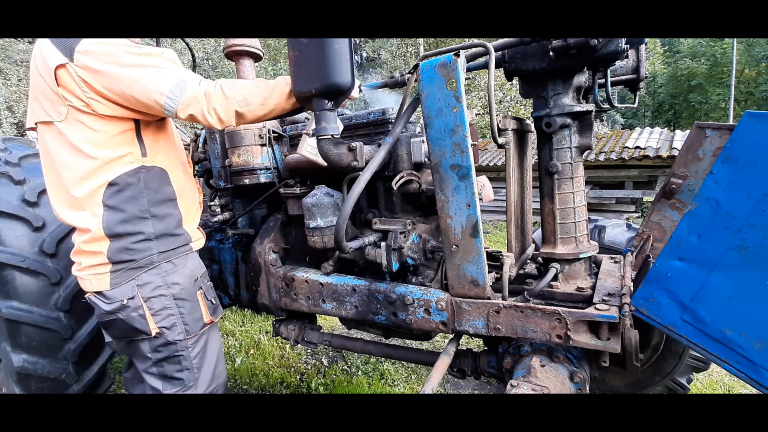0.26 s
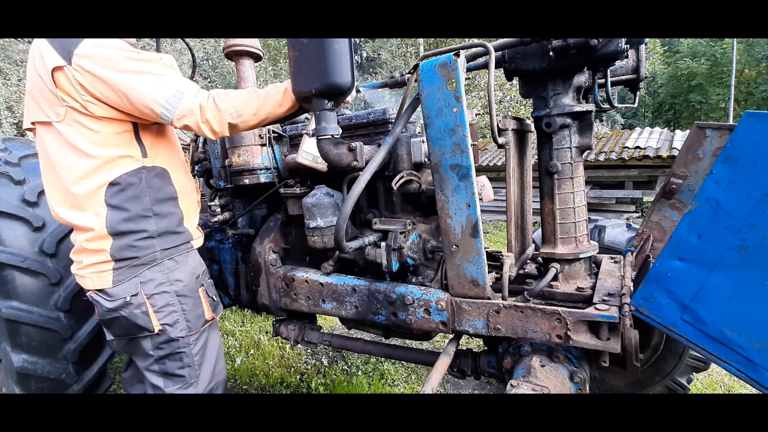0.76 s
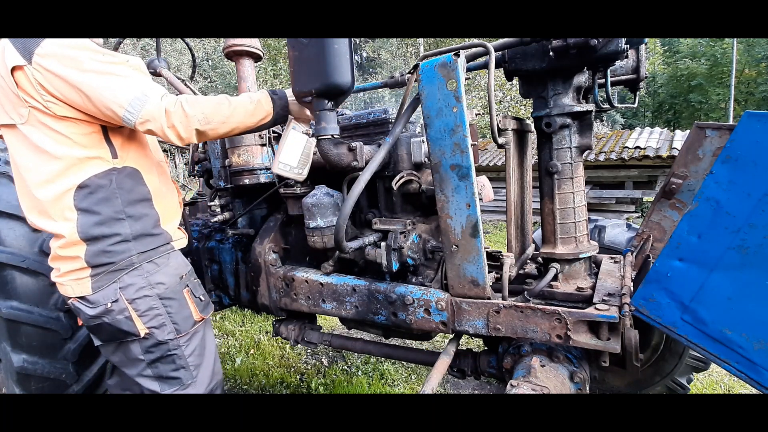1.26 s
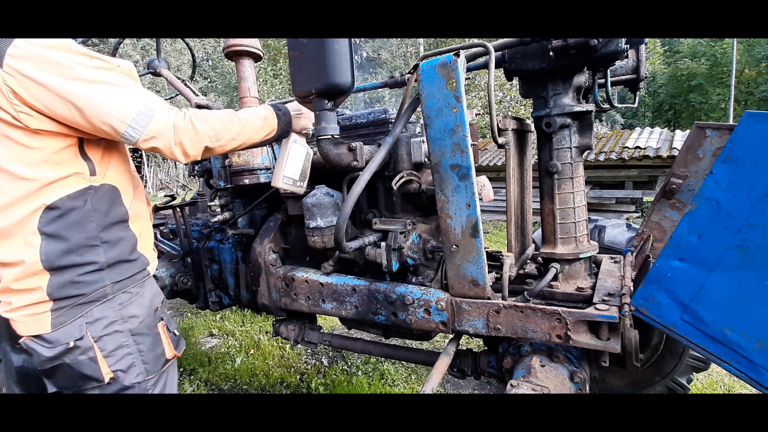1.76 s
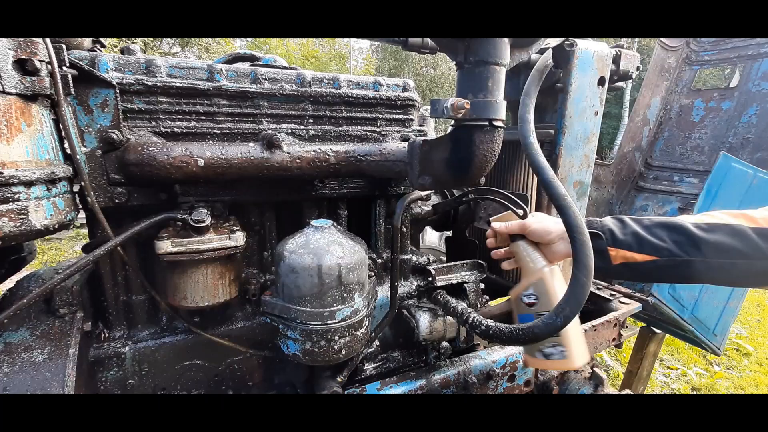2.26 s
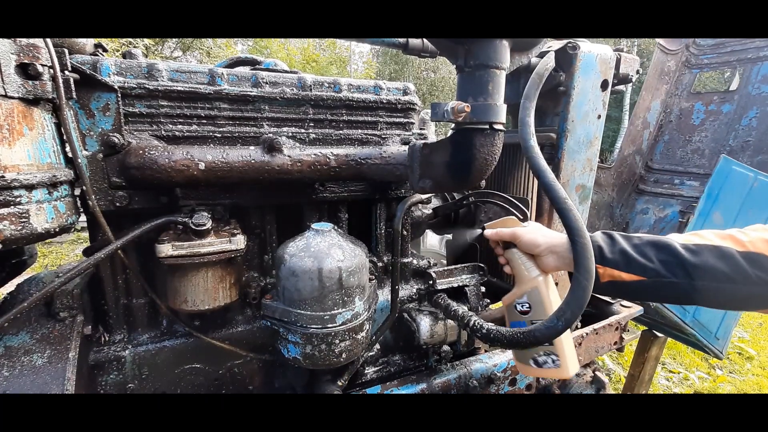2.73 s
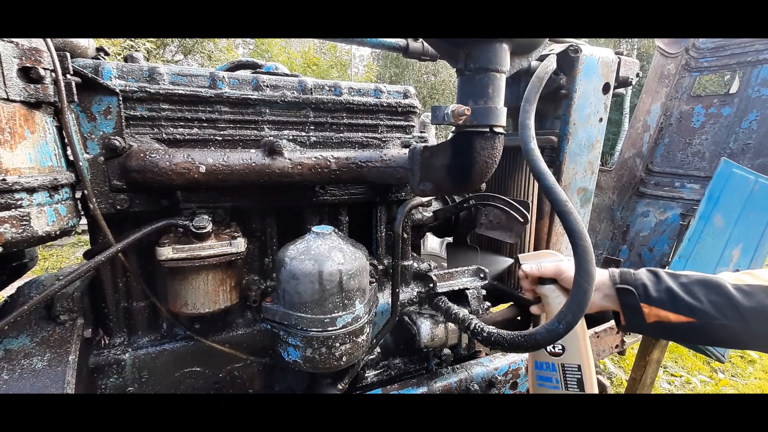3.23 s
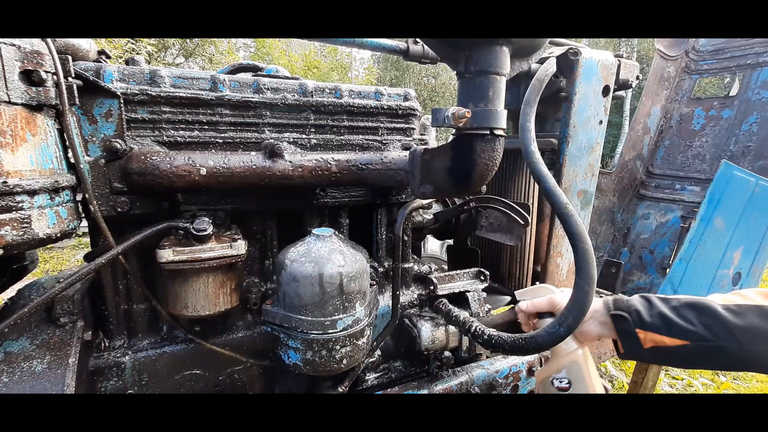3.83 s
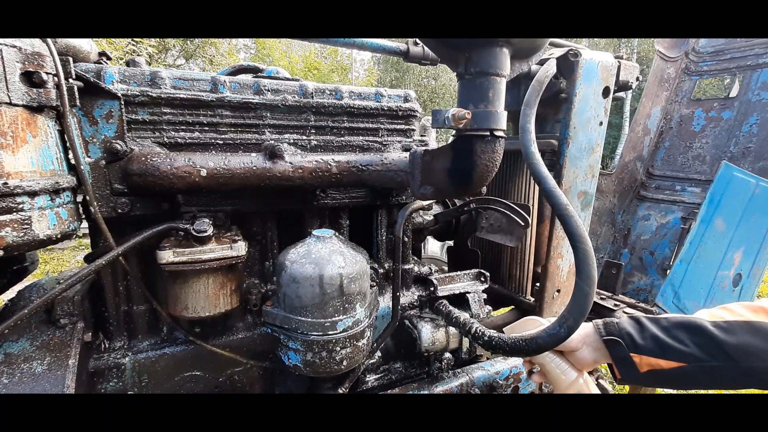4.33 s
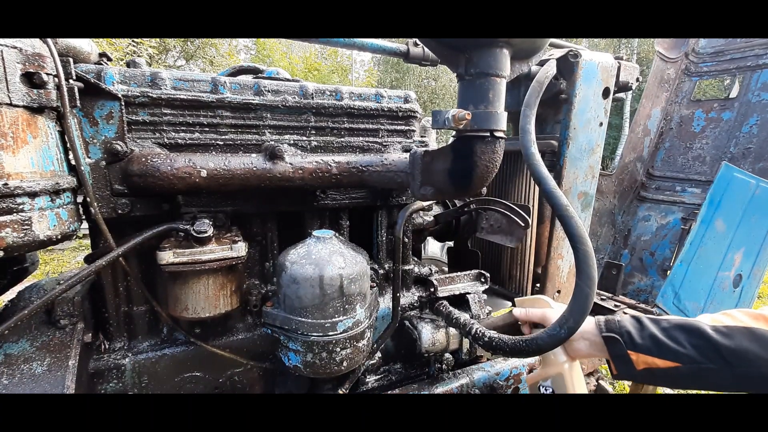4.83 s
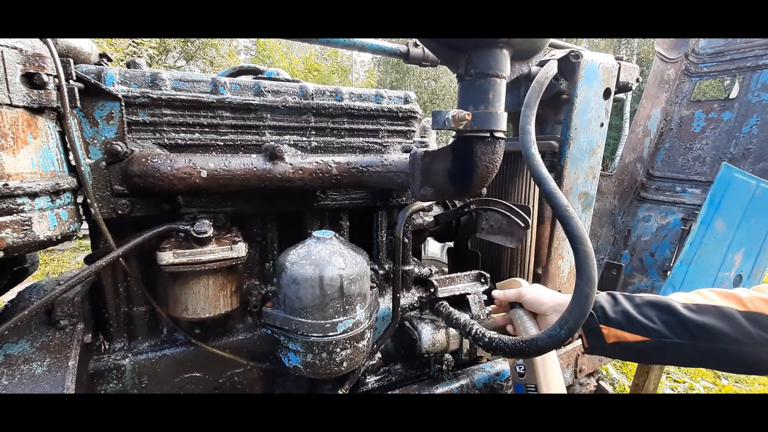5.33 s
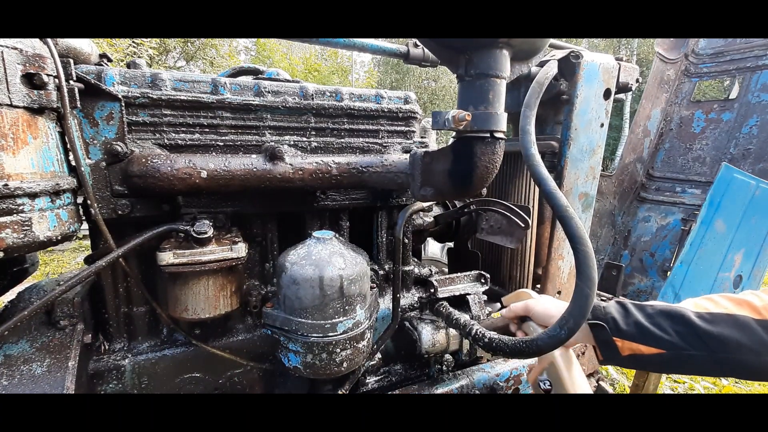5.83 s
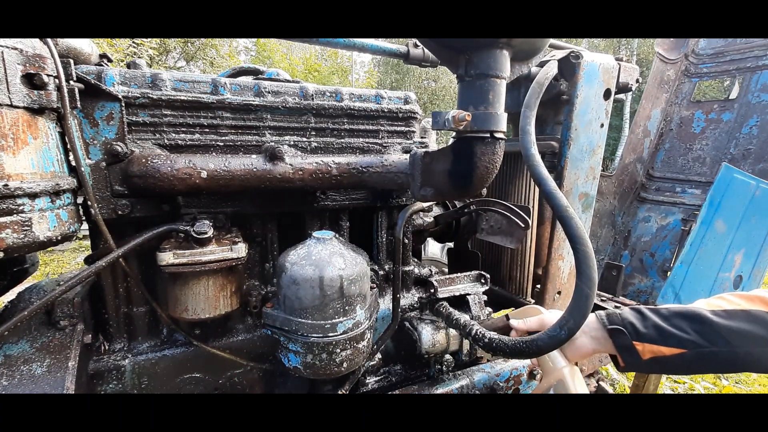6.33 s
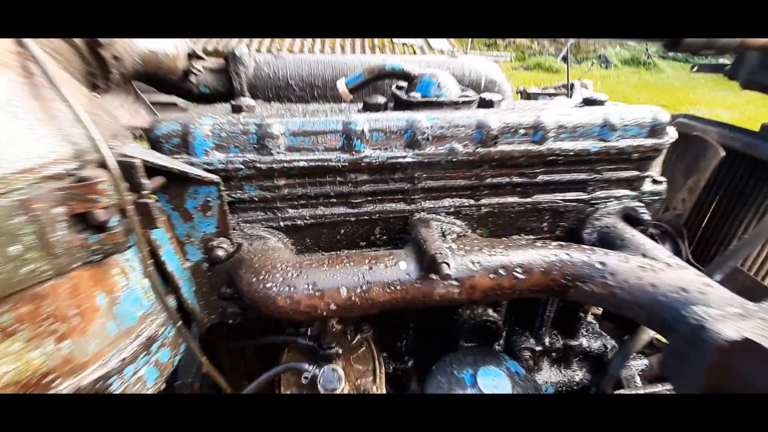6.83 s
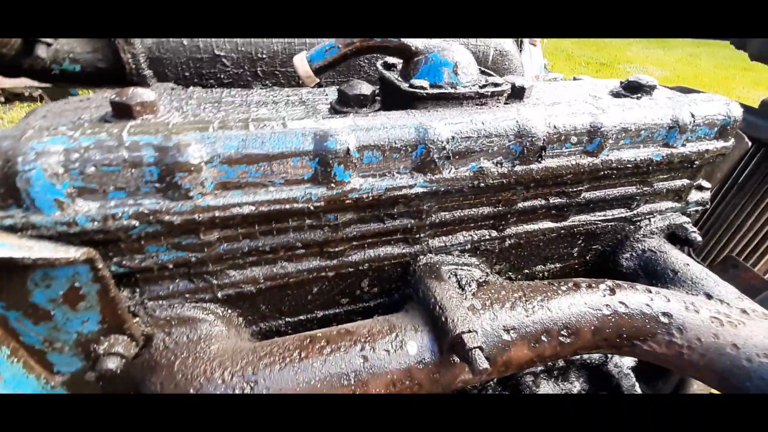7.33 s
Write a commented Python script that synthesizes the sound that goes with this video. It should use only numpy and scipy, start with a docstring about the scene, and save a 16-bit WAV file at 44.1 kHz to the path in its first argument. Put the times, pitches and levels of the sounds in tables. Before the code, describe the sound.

Outdoors, heard by a handheld stereo microphone. From 0 to 2.3 s a hand trigger sprayer gives soft, airy hisses roughly every 0.28 s, strongest near 0.3 to 0.8 s and then thinning, with tiny valve ticks between. Low wind buffets bump the microphone, most at 0.65 s, over faint leaf rustle. A very short fade at 2.33 s jumps close, with the wind gone: bright, wetter squirts every 0.3 s spatter on metal, slightly to the left, with crisp valve spits and dry plastic trigger knocks, the hardest at 3.07 s. A dull handling thump lands at 2.66 s, and brief hollow rasps come at 2.8, 3.75 and 5.6 s. Pulls soften after 4.9 s; knocks stop by 5.5 s. Another quick fade at 6.45 s leaves quiet rustle and murmur, a faint bump at 6.8 s and weak, raspy swishes at 7.25 and 7.4 s.

```python
"""First comes the soft hiss of a hand trigger sprayer, amid rustling trees and wind; it is pumped about
three times a second at a greasy engine outdoors. Hiss, valve spits, rasps, leaves and wind are shaped noise;
trigger knocks are sums of damped modes, and bumps excite the resonances of a handheld housing with two ports.
Delay, level difference and scattering set three listening positions, joined by short fades."""
import sys
import numpy as np
from scipy import signal
from scipy.fft import rfft, irfft, next_fast_len
from scipy.io import wavfile
from scipy.ndimage import uniform_filter1d, map_coordinates

SR = 44100
rng = np.random.default_rng(int(sys.argv[2]) if len(sys.argv) > 2 else 0)


def waveform_to_disk(signal):
    """Save audio, clipped to [-1, 1], as 16-bit WAV at the path in sys.argv[1]."""
    frames = np.transpose(np.atleast_2d(signal))
    scaled = np.clip(frames, -1, 1) * 32767
    samples = np.round(scaled).astype(np.int16)
    wavfile.write(sys.argv[1], SR, samples)


def invert_db(level):
    """Linear amplitude ratio for a level in decibels (20 dB per decade), elementwise."""
    return 10 ** (np.asarray(level, dtype=float) / 20)


N = 334278
T = np.arange(N) / SR  # seconds

# Relative spectrum of the liquid jet. Each row: frequency in Hz, density in dB per Hz.
JET = [(300, -41.5), (600, -14.5), (850, -14.5), (1050, -5.5), (1400, -1), (1750, -2.5), (2050, 1.5),
       (3000, 0), (5000, 2.5), (7000, -1), (10000, 2.5), (13000, -1.5), (16000, 1.5)]
# Listening positions. Each row: start in seconds, lag of the left port in samples,
# left-right difference in dB (reached at 7.5 kHz), direct share of the power at low frequency (0-1).
PLACES = [(0, -1, -2, 0.59), (2.335, 6, -5.5, 0.45), (6.446, 5.5, -4.5, .6)]


def unit(x):
    """Normalisation: a signal divided by its root mean square has rms 1."""
    return x / np.sqrt(np.mean(x ** 2) + 1e-20)


def along(points, hz):
    """Log-frequency interpolation: (Hz, value) points are joined by lines over log frequency."""
    f, v = np.transpose(points)
    return np.interp(np.log(hz + 1), np.log(f + 1), v)


def wobble(rate):
    """Band-limited random modulation: a spline through random knots, rate of them a second."""
    knots = rng.standard_normal(int(N * rate / SR) + 4)
    return map_coordinates(knots, [T * rate])


def coloured(x, spectrum):
    """Linear filtering: the transform of x is multiplied by a (Hz, dB) magnitude response."""
    m = next_fast_len(N + 8192)
    response = invert_db(along(spectrum, np.fft.rfftfreq(m, 1 / SR)))
    return irfft(rfft(x, m) * response, m)[..., :N]


def rush(spectrum, patchy_db):
    """Turbulent noise: three incoherent signals share patchy power, with rms 1 from 2.5 to 7.5 kHz.
    The first is for the direct path, the others for the sound scattered to each port."""
    hz, t, z = signal.stft(rng.standard_normal((3, N)), SR, nperseg=512)
    field = uniform_filter1d(rng.standard_normal(z.shape[1:]), 3, 0)  # patches over frequency
    field = uniform_filter1d(field, 8, 1)  # and over time
    gain = invert_db(along(spectrum, hz)[:, None] + patchy_db * unit(field))
    band = (hz > 2500) & (hz < 7500)
    return hz[:, None], t, z * gain / np.sqrt(np.mean(gain[band] ** 2) * band.mean())


def tilt(hz, low_db, high_db):
    """Spectral balance: gain grows by 0.58 low_db per octave below 3.2 kHz, for at most 1.8 octaves.
    A shelf centred on 9 kHz, above the port notch, adds high_db."""
    octaves = np.clip(np.log2(3200 / (hz + 1)), 0, 1.8)
    return invert_db(0.58 * low_db * octaves + high_db / (1 + (9000 / (hz + 1)) ** 8))


def spray():
    """Jet turbulence: flow noise swells and sags with the pump pressure of each pull."""
    # Each row: peak time in seconds, level in dB, rise and fall in seconds, fine mist (treble) in dB.
    # The last two are softer swishes of the same colour.
    pulls = [(0.03, -54, 0.082, 0.081, 4), (0.275, -48.5, 0.069, 0.087, 0),
             (0.564, -47.5, 0.09, 0.082, -0.5), (0.832, -49, 0.083, 0.083, -0.5),
             (1.101, -51.5, 0.073, 0.11, 2.5), (1.391, -53, 0.081, 0.086, 4),
             (1.684, -52.5, 0.093, 0.079, 3), (1.95, -54, 0.077, 0.11, 3.5), (2.235, -56, 0.07, 0.099, 4),
             (2.393, -41.5, 0.044, 0.1, 0.5), (2.704, -42.5, 0.065, 0.1, -0.5),
             (3.011, -42, 0.078, 0.096, 0.5), (3.301, -42.5, 0.066, 0.11, 5),
             (3.629, -42, 0.084, 0.089, 1.5), (3.913, -43.5, 0.06, 0.099, 1.5),
             (4.248, -43.5, 0.1, 0.075, -0.5), (4.538, -44, 0.079, 0.11, 0),
             (4.867, -45.5, 0.087, 0.084, -0.5), (5.184, -48, 0.079, 0.1, 2), (5.5, -48.5, 0.073, 0.12, 6),
             (5.841, -48, 0.1, 0.069, 3.5), (6.148, -47.5, 0.095, 0.1, -0.5),
             (6.408, -57, 0.026, 0.062, 0.5), (7.257, -54, 0.065, 0.11, 3.5),
             (7.405, -59, 0.15, 0.076, -0.5)]
    # The aim wanders over the metal and the splash fills the hiss below 3 kHz.
    # Each row: time in seconds, splash in dB as the low_db of tilt().
    splash = [(0.03, -10), (0.275, -21.5), (0.83, -14), (1.39, -7), (2.24, -2.5), (2.7, 3), (3.01, -3),
              (3.91, -0.5), (4.87, 2.5), (5.5, 5.5), (7.4, 3)]
    sag_db, squareness = 27.5, 2.84  # sag_db is lost one rise or fall time away from the peak
    hz, t, z = rush(JET, patchy_db=1.5)
    power = 0
    for s, db, rise, fall, mist_db in pulls:
        away = np.where(t < s, (s - t) / rise, (t - s) / fall)
        splash_db = np.interp(s, *np.transpose(splash))
        swell = invert_db(db - sag_db * away ** squareness)
        power = power + (swell * tilt(hz, splash_db, mist_db)) ** 2
    drops = invert_db(0.86 * wobble(400))  # uneven droplets make the hiss grainy
    hiss = signal.istft(z * np.sqrt(power), SR, nperseg=512)[1][:, :N]
    return unit(drops) * hiss


def trees():
    """Diffuse sources: leaves and dripping cleaner rustle over a duller, partly coherent murmur of the yard."""
    # Each row: time in seconds, rustle in dB, murmur in dB.
    air = [(0.14, -71, -80), (0.42, -71, -82), (0.96, -72.5, -83.5), (1.25, -70.5, -82),
           (1.55, -73.5, -79.5), (2.1, -70.5, -83), (2.57, -59.5, -67.5), (2.89, -66.5, -71),
           (3.18, -70.5, -75.5), (3.43, -74.5, -78.5), (3.8, -68, -70.5), (4.04, -73, -78.5),
           (5.3, -75, -76), (5.66, -69, -82.5), (5.85, -64.5, -67.5), (6.08, -63.5, -62.5),
           (6.27, -68.5, -75.5), (6.5, -72, -73.5), (6.6, -76, -80), (6.9, -70, -76.5), (7.05, -79, -81),
           (7.15, -68, -73), (7.57, -74, -76)]
    # Relative spectra of rustle and murmur. Each row: frequency in Hz, density in dB per Hz.
    leaves = [(900, -13.5), (1400, -2.5), (1550, 0.5), (1700, -14), (1950, -1.5), (2080, 1), (2300, -9.5),
              (4000, -4.5), (6200, -4.5), (10000, -6.5), (16000, -3)]
    yard_colour = [(120, 1.5), (200, -3.5), (500, 0.5), (900, 0), (1300, -16)]
    s, rustle_db, murmur_db = np.transpose(air)
    rustle = signal.istft(rush(leaves, patchy_db=1.9)[2], SR, nperseg=512)[1][1:, :N]
    shared = 0.37 * rng.standard_normal(N)  # the part common to both ports
    noise = rng.standard_normal((2, N)) + shared
    murmur = unit(coloured(noise, [(30, -57.5)] + yard_colour))
    rustle_gain = invert_db(np.interp(T, s, rustle_db) + 2.7 * wobble(15))
    murmur_gain = invert_db(np.interp(T, s, murmur_db) + 1.2 * wobble(8))
    return rustle_gain * rustle + murmur_gain * murmur


def wind():
    """Turbulent pressure: lumpy low noise, incoherent between the ports; the later positions are sheltered."""
    # Each row: time in seconds, buffet level in dB (midway between the ports).
    gusts = [(0.0, -57), (0.23, -57), (0.28, -72), (0.34, -53), (0.5, -78), (0.65, -45.5), (0.73, -71.5),
             (0.85, -64.5), (1.02, -88), (1.1, -59.5), (1.28, -57), (1.34, -84), (1.37, -56), (1.41, -50.5),
             (1.44, -71), (1.5, -57.5), (1.81, -89), (1.82, -84), (1.99, -57.5), (2.1, -67.5), (2.3, -68),
             (2.33, -86)]
    # Relative spectrum. Each row: frequency in Hz, density in dB per Hz.
    buffet_colour = [(15, -38), (25, -22.5), (44, -9), (66, -1), (119, -11), (241, -36), (300, -31),
                     (390, -46.5), (660, -120)]
    s, db = np.transpose(gusts)
    lumps = invert_db(2.3 * np.array([wobble(19), wobble(3.3)]))  # quick on the left, slow on the right
    buffet = unit(lumps * coloured(rng.standard_normal((2, N)), buffet_colour))
    level_db = np.interp(T, s, db, right=-83)  # calm after the last row
    return buffet * invert_db(level_db + np.array([[1.5], [-1.5]]))


def valve():
    """Transient flow noise: a tick, a few ms of sputter and an airy trail, with a low resonant wall pop.
    The valve spits as a pull starts and ticks thinly as it refills."""
    # Each row: start in seconds, level in dB, lows in dB as the low_db of tilt(), pop in dB re the level.
    spits = [(0.188, -60, -23, -19), (0.466, -57, -14, -21), (0.743, -57, -7, -15), (1.017, -56.5, -3, -25),
             (1.293, -63, -6, -3.5), (1.586, -66, 7, -12), (1.861, -61.5, -25, -20), (2.141, -72, 20, -20),
             (2.5364, -50, 13, -28), (2.543, -46.5, 6, -27), (2.615, -42.5, 6.5, -28),
             (2.925, -42, 2.5, -26), (3.146, -53, -7, -26), (3.2166, -42.5, 0.5, -9.5),
             (3.45, -64, -14, -24), (3.499, -56.5, 4, -15), (3.531, -43, 2.5, -16), (3.8357, -44.5, 2, -19),
             (4.058, -61.5, -3.5, -24), (4.137, -45.5, 4.5, -9), (4.376, -63, -19, -14),
             (4.4486, -43, 3.5, -8), (4.685, -60, -15, -22), (4.764, -49, 2, -3.5), (4.99, -59, -11, -12),
             (5.084, -57, 8, -6), (5.326, -62, -18, -3), (5.4043, -50, 6, -9), (5.655, -56.5, -22, -17),
             (5.7322, -45, 6.5, -15), (6.0463, -45, 11, -18), (6.284, -60, -30, -19),
             (6.3692, -42.5, 2, -11)]
    # Ring of the valve seat. Each row: frequency in Hz, gain in dB.
    seat = [(3300, 0.5), (4400, 4.5), (5500, -2)]
    pop_hz, pop_rough = 256.7, 0.033  # pitch of the bottle wall, its phase wander in rad per sample
    sputter_s = 0.0074  # the sputter peaks at half this time
    out, t = np.zeros(N + SR), T[:4096]
    hz = np.fft.rfftfreq(len(t), 1 / SR)
    for s, db, low_db, pop_db in spits:
        treble_db = 4 - 0.3 * low_db  # a spit thin in the lows gains treble
        tick = 1.3 * np.exp(-t / 0.0008)
        sputter = 1.14 * np.exp(-(2 * t / sputter_s - 1) ** 2)
        trail = 0.122 * np.exp(-t / 0.009)
        burst = (tick + sputter + trail) * rng.standard_normal(len(t))
        colour = invert_db(along(JET, hz) + along(seat, hz)) * tilt(hz, low_db, treble_db)
        puff = irfft(rfft(burst) * colour)
        wander = np.cumsum(rng.normal(0, pop_rough, len(t)))
        pop_shape = t / 0.0083 * np.exp(-t / 0.0084)
        pop = invert_db(pop_db) * pop_shape * np.sin(2 * np.pi * pop_hz * t + wander)
        out[round(s * SR):][:len(t)] += invert_db(db) * (puff + pop)
    return out[:N]


def splutter():
    """Two-phase flow: air in the pump now and then gives a rough, hollow rasp, a band of modulated noise."""
    # Each row: centre in seconds, level in dB, time from the centre to 1/e in seconds, pitch in Hz.
    rasps = [(2.131, -61, 0.0066, 1220), (2.822, -48, .01, 1600), (3.75, -56.5, 0.027, 1500),
             (5.579, -52, 0.021, 1160), (7.285, -61, 0.085, 1260), (7.407, -64, 0.06, 1340)]
    out = np.zeros(N)
    for s, db, length, hz in rasps:
        band = [(hz / 1.13, -30), (hz / 1.27, -3), (hz, 0), (hz * 1.34, -3), (hz * 1.5, -25)]
        hollow = coloured(rng.standard_normal(N), band)
        envelope = np.exp(-((T - s) / length) ** 2)
        out += invert_db(db + 2.8 * wobble(70)) * envelope * unit(hollow)
    return out


def trigger():
    """Modal impact: each knock on the stop rings the plastic's damped modes; the grip shifts them."""
    # Each row: time in seconds, level in dB, treble in dB, ring near 2 kHz in dB, snap near 5 kHz in dB.
    stops = [(2.518, -24, -9, 5.5, -3), (2.823, -25, -3, 1, -4), (3.065, -12.5, -5, -4.5, -1),
             (3.359, -32, -32, 2, -3), (3.744, -28.5, -2, -11, 7), (4.257, -23, -1, 3, 7),
             (4.574, -24, -59, -1.5, -2), (4.871, -23.5, -12, 7, -0.5), (5.199, -25, -63, 4.5, -6),
             (5.338, -52, -18, -2, -13), (5.483, -36.5, -26, 0.5, -6)]
    # Each row: mean mode frequency in Hz, mean level in dB, decay time to -60 dB in seconds.
    trigger_modes = [(949, 0.5, 0.014), (1205, 0, .018), (1500, -0.5, 0.0092), (2035, -1, 0.019),
                     (2630, 0, 0.01), (3240, -1, 0.0055), (4040, -1.5, 0.0046), (4855, 2, 0.0067),
                     (5380, -2.5, 0.0054), (6020, -8.5, 0.0045), (7080, 1.5, 0.0048), (11400, -2, .004),
                     (14000, -3, 0.003)]
    crack_db, crack_t60 = -0.5, 0.0051  # noise of first contact; decay in seconds
    out, t = np.zeros(N + SR), T[:2000]
    modes, level, t60 = np.transpose(trigger_modes)[:, :, None]
    for s, db, treble_db, ring_db, snap_db in stops:
        low_db = 0.35 * (-43 - db)  # harder blows have less low knock
        grip_db = ring_db * (abs(modes - 2000) < 150) + snap_db * (abs(modes - 5100) < 600)
        hz = modes * (1 + rng.normal(0, 0.02, modes.shape))
        mode_db = level + grip_db + rng.normal(0, 1.5, hz.shape)
        size = invert_db(mode_db) * tilt(hz, low_db, treble_db)
        sign = (-1) ** np.arange(len(hz))[:, None]  # neighbouring modes swing in opposition: no bass
        envelope = invert_db(-60 * t / t60) * (1 - np.exp(-t * hz / 1.2))
        ring = sign * size * envelope * np.sin(2 * np.pi * hz * t)
        contact = np.convolve(rng.standard_normal(len(t)), [1, 0, 0, -1], "same")
        crack = invert_db(crack_db + treble_db - 60 * t / crack_t60) * contact
        out[round((s + 0.0008) * SR):][:len(t)] += invert_db(db) * (ring.sum(0) + crack)
    return coloured(out[:N], [(350, -31), (580, 0)])


def echoes(x):
    """Scattering: the engine block returns decaying noise-like echoes, incoherent between the ports.
    The hand moves, so the pattern changes eight times a second."""
    # Each row: frequency in Hz, decay time to -60 dB in seconds.
    block = [(500, 0.082), (2000, 0.074), (4000, 0.029), (8000, 0.047), (16000, 0.027)]
    out, step = np.zeros((2, N + SR)), SR // 8
    for at in range(0, N, step):
        hz, t, z = signal.stft(rng.standard_normal((2, step)), SR, nperseg=128)
        decay = invert_db(-60 * t / along(block, hz)[:, None])
        tail = signal.istft(z * decay, SR, nperseg=128)[1]
        tail = tail / np.linalg.norm(tail[0])
        piece = signal.fftconvolve(x[None, at:at + step], tail, axes=1)
        out[:, at + 80:][:, :piece.shape[1]] += piece  # first echo 80 samples late
    return out[:, :N]


def placed(direct, scattered, far_share):
    """Interaural cues: direct sound differs in time between the ports, and all sound in level.
    The scattered share of the power grows with frequency and with far_share."""
    hz, t, z = signal.stft(np.vstack([direct, scattered]), SR, nperseg=256)
    hz = hz[:, None]
    place = np.searchsorted(np.transpose(PLACES)[0], t, "right") - 1
    start, lag, pan_db, share = np.transpose(PLACES)[:, place]
    share = 1 - far_share * (1 - share / (1 + (hz / 12000) ** 2))
    share = np.clip(share, 0, 1)
    side = np.array([1, -1])[:, None, None]
    turn = np.exp(-1j * np.pi * side * hz * lag / SR)  # half the lag on each side
    mixed = np.sqrt(share) * z[0] * turn + np.sqrt(1 - share) * z[1:]
    pair = mixed * invert_db(side * pan_db / 2 * (0.75 + hz / 30000))
    return signal.istft(pair, SR, nperseg=256)[1][:, :N]


def bumps():
    """Forced resonance: a push and a short rough scrape of the hand excite the housing; the bass lingers."""
    # Each row: start in seconds, shove in dB, boom (below 150 Hz) in dB, rap (above 500 Hz) in dB,
    # rise of the scrape in seconds.
    shoves = [(2.657, -20.5, 2, 4.5, 0.0017), (5.445, -39.5, -2.5, -3, 0.0029),
              (6.825, -41, -2, -2, 0.0049)]
    # Resonances. Each row: frequency in Hz, width in Hz, level in dB.
    housing = [(57.8, 42, 0.5), (102.5, 125, 1.5), (184, 140, -1), (335, 120, 1), (515, 160, -4.5),
               (777, 375, -4), (1063, 200, -11.5)]
    t60_at_200_hz, spread = 0.22, 0.62  # scrape decay in seconds; part that differs between the ports
    out, t = np.zeros((2, N + SR)), T[:16384]
    f = np.fft.rfftfreq(len(t), 1 / SR)
    push = 1.46 * np.exp(-t / 0.00057)
    for s, db, boom_db, rap_db, rise in shoves:
        noise = unit(rng.standard_normal(len(t)) + spread * rng.standard_normal((2, len(t))))
        for hz, width, level in housing:
            decay = invert_db(-60 * t / t60_at_200_hz * (hz / 200) ** 0.5)
            shake = noise * decay * (1 - np.exp(-t / rise)) + push
            resonance = 1j * f * width / (hz * hz - f * f + 1j * f * width)
            ring = irfft(rfft(shake) * resonance ** 2)
            ring_db = db + level + boom_db * (hz < 150) + rap_db * (hz > 500)
            out[:, round(s * SR):][:, :len(t)] += invert_db(ring_db) * ring
    return out[:, :N]


def scene():
    """Superposition: sprayer and yard pass the port response; wind and handling act on the ports directly."""
    # Response of the ports. Each row: frequency in Hz, gain in dB.
    ports = [(7500, 0), (8050, -4.5), (8350, -20), (8900, -13.5), (9500, -10.5), (10200, -10), (11500, -3),
             (15600, -3.5), (15900, -46.5), (17000, -48.5)]
    jet = spray()
    clicks = trigger() + valve()
    flow = placed(jet[0] + splutter(), jet[1:], far_share=1)
    knocks = placed(clicks, invert_db(-2) * echoes(clicks), far_share=0.31)
    yard = placed(np.zeros(N), trees(), far_share=9)  # clipped: wholly scattered
    return coloured(flow + knocks + yard, ports) + wind() + bumps()


def band_limit(x):
    """A steep low-pass at the top of the band."""
    return signal.sosfilt(signal.butter(12, 16980, fs=SR, output="sos"), x)


def record(dry):
    """Amplitude envelope: the sound fades out and in again where the position changes."""
    fade_s = 0.037  # each way
    fade = np.ones(N)
    for s, *_ in PLACES[1:]:
        fade = fade * np.clip(abs(T - s) / fade_s, 0.02, 1) ** 1.08
    return band_limit(dry * fade)


dry = scene()
out = record(dry)
waveform_to_disk(out)
```